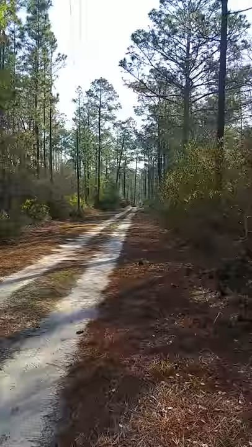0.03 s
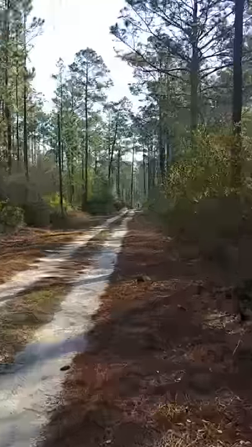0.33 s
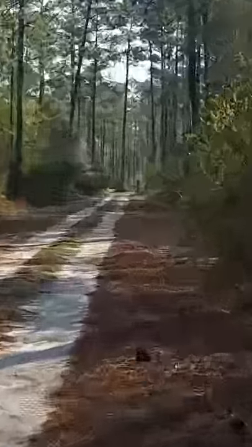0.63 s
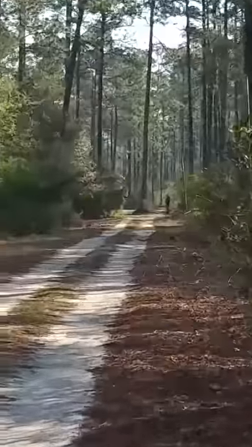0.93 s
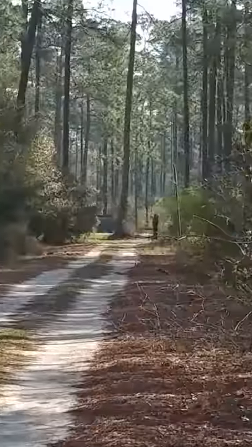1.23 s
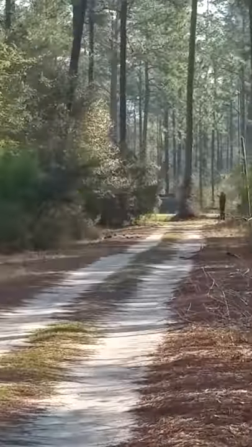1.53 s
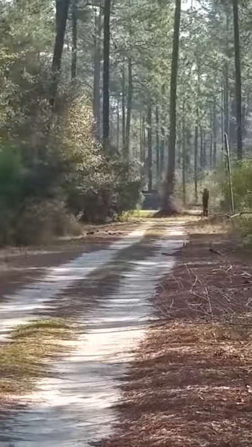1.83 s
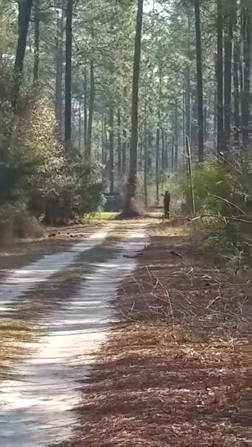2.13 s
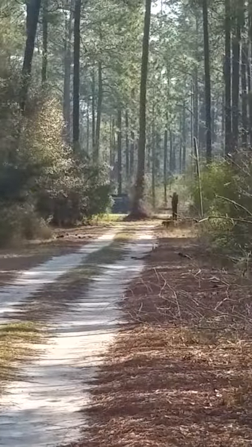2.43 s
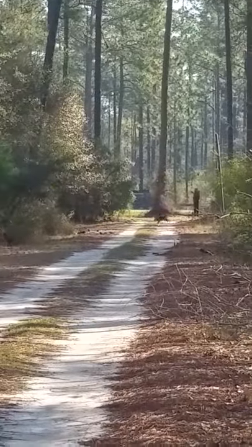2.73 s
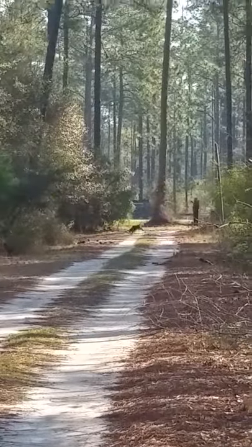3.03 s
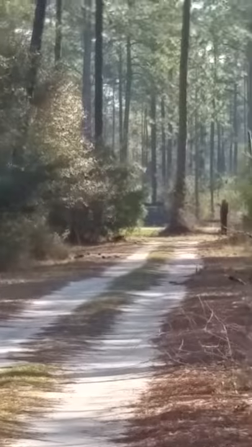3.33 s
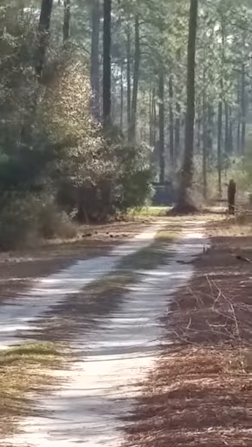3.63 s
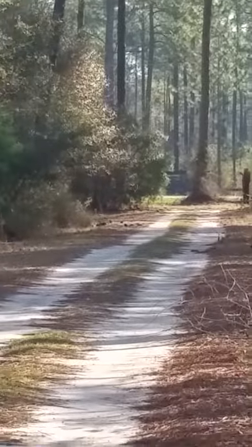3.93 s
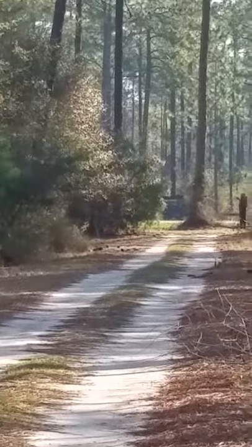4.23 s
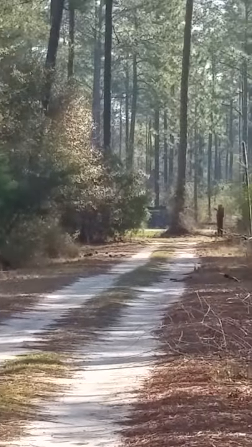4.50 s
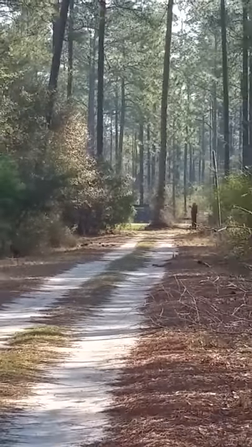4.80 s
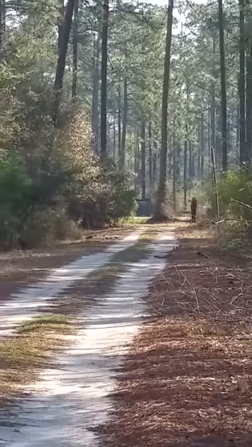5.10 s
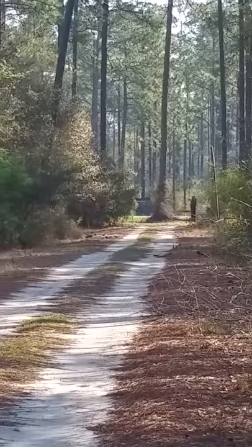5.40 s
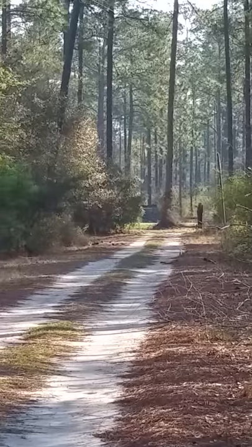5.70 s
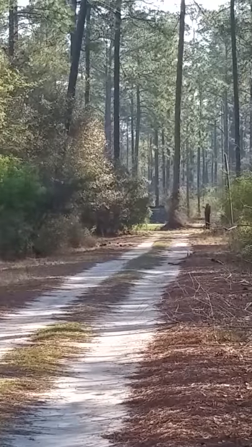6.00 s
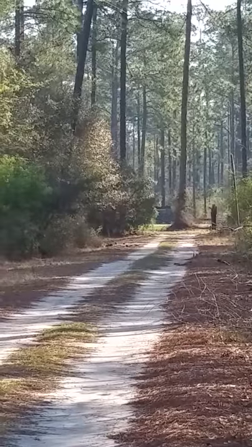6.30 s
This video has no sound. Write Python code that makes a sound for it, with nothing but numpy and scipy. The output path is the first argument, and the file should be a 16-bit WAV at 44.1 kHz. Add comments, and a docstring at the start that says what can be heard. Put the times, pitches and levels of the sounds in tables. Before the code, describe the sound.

Hounds bay and yelp in echoing woods, one deeper dog closer, with soft handling thuds on the microphone.

```python
"""Hounds baying along a trail in pine woods, heard from a hand-held camera's two microphones.
A deep-voiced dog passes closer for four loud calls, each a high yelp that breaks into a hoarse bay.
A shriller dog and the pack stay farther off, and the trunks scatter their cries into a long echo.
Close up, fingers bump and rub the camera and a few twigs tick, over a faint hush and microphone hiss."""
import sys
import numpy as np
from scipy import signal
from scipy.fft import rfft, irfft, next_fast_len
from scipy.io import wavfile
from scipy.ndimage import uniform_filter1d

SR = 44100
rng = np.random.default_rng(int(sys.argv[2]) if len(sys.argv) > 2 else 0)


def unload_wav(signal):
    """Save mono or channel-first audio to the path in sys.argv[1] as 16-bit WAV at rate SR, clipped to [-1, 1]."""
    wavfile.write(
        sys.argv[1],
        SR,
        np.round(np.clip(np.atleast_2d(signal).T, -1, 1) * 32767).astype(np.int16),
    )


N = 288855
TIME = np.arange(N) / SR

# voice of the shrill hound and the pack as it carries over the ground: f/Hz, level/dB
SHRILL_THROAT = [(150, -53), (440, -20.5), (590, 4.5), (740, -3.5), (900, 0.5), (1070, 0.5), (1350, -5.5),
                 (1800, -8), (2020, -15), (2230, -8), (2480, -16), (3150, -34), (9000, -72)]
# contour of a bark: crest/share of length, rise/octaves, fall/octaves, steepness of the fall,
# start level/dB, end level/dB, growth of roughness
BARK_ARCH = (0.39, 0.1, 0.26, 1.5, -4, -6, 0.07)


def deep_hound(yelp_s=0.0454, break_s=0.029, yelp_ratio=1.38, yelp_rough=0.14, echo_db=-10):
    """Nearest dog: a yelp cracks down into a bay; brush hides him except when he crosses the track."""
    # t/s, yelp level/dB, bay length/s, bay f/Hz, bay level/dB, direct gain/dB, tilt/(dB per octave)
    calls = [(2.208, -37, 0.16, 655.5, -32.5, -13, 9.5), (3.172, -31.5, .14, 658.6, -29.5, 0, 3),
             (3.503, -30, 0.12, 598.7, -34, 1.5, 0), (3.836, -32.5, 0.12, 599, -35.5, .5, -1.5),
             (4.174, -35, .125, 599, -37.5, -2, -0.5), (4.836, -53, .14, 595.4, -39.5, -6, 6),
             (5.202, -41.5, .13, 593, -38.5, -4.5, 3)]
    # the nearly pure yelp and the fuller bay as they carry over the ground: f/Hz, level/dB
    head_voice = [(200, -42), (800, 1.5), (1100, -4.5), (1650, -20), (2500, -30), (3400, -43), (9000, -100)]
    throat = [(150, -55), (330, -38), (440, -15), (540, -12), (630, 7), (800, -9.5), (1100, -3.5),
              (1280, -16), (1450, -21.5), (1760, -13.5), (2080, -29), (2330, -27), (2850, -26.5),
              (3300, -49), (9000, -100)]
    # contours of yelp and bay: columns as in BARK_ARCH
    yelp_arch = (0.72, 0.28, 0, 3.5, -19.5, -18, 0.7)
    bay_arch = (0.4359, 0.41, 0.55, 2.5, -12, -6, 1)
    direct, uttered = np.zeros((2, N))
    for k, (s, yelp_db, length, hz, bay_db, direct_db, tilt) in enumerate(calls):
        rough = 0.22 + 0.065 * k  # hoarser with every call
        yelp = voice(yelp_s, arch(*yelp_arch), yelp_ratio * hz, yelp_rough, head_voice)
        bay = voice(length, arch(*bay_arch), hz, rough, tilted(throat, hz, tilt))
        call = np.zeros(SR // 2)
        add(call, 0, gain_of(yelp_db) * yelp)
        add(call, break_s, gain_of(bay_db) * bay)
        add(uttered, s, call)
        add(direct, s, gain_of(direct_db) * call)
    return direct + gain_of(echo_db) * woods(uttered)


def shrill_hound(easy_hz=1057.2, bark_hz=587, direct_db=-3, echo_db=-1, bounce_s=0.065, bounce_db=-6):
    """Farther off: a thin yelp breaks into a rough bark about an octave lower, half lost in echo."""
    # t/s, yelp length/s, starting f/Hz, yelp level/dB, bark level/dB
    calls = [(0.476, 0.048, 1182, -46.5, -47.5), (0.821, 0.052, 1156, -45, -46.5),
             (1.197, 0.063, 1089, -46.5, -45), (1.566, 0.047, 1082, -46.5, -45),
             (1.922, 0.052, 1101, -46, -47.5), (2.238, 0.051, 1097, -45, -47.5),
             (2.643, 0.049, 1064, -44, -47.5), (3.004, .09, 1120, -45, -48),
             (3.677, .045, 1235, -40.5, -49), (4.043, .07, 1063, -46.5, -49), (4.399, .04, 908, -49, -45.5),
             (4.813, .04, 1139, -47.5, -44), (4.918, 0.058, 990, -45, -46.5), (5.246, .06, 1129, -46, -50),
             (5.47, .05, 1101, -60, -45.5), (5.811, .06, 1182, -55.5, -50.5)]
    dog, repeats = np.zeros((2, N))
    for s, length, yelp_hz, yelp_db, bark_db in calls:
        fall = 0.651 * np.log2(yelp_hz / easy_hz)  # slides part of the way to the dog's easy pitch
        slide = arch(crest=0.15, rise=0, fall=fall, steep=0.73, start_db=-7.5, end_db=-4, hoarser=0.9)
        bright_throat = tilted(SHRILL_THROAT, yelp_hz, db_per_octave=2)
        yelp = gain_of(yelp_db) * voice(length, slide, yelp_hz, rough=0.11, throat=bright_throat)
        bark = voice(0.085, arch(*BARK_ARCH), bark_hz, rough=0.83, throat=SHRILL_THROAT)
        add(dog, s, yelp)
        add(dog, s + 0.6 * length, gain_of(bark_db) * bark)
        # the yelp bounces between the walls of trees on both sides of the trail
        for bounce in range(1, 4):
            add(repeats, s + bounce * bounce_s, gain_of(bounce * bounce_db) * yelp)
    return gain_of(direct_db) * (dog + repeats) + gain_of(echo_db) * woods(dog)


def far_pack(count=48, bay_hz=590, yelp_hz=1130, spread=0.055, chorus_db=-56):
    """Deep in the woods: a passing chorus of yelps and bays, heard only as echo; two dogs howl."""
    # drawn-out cries: t/s, length/s, f/Hz, level/dB, roughness/0-1
    howl_calls = [(6.227, .24, 715, -48.5, 0.23), (6.247, .19, 1043, -48.5, 0.47)]
    # contour of a howl: columns as in BARK_ARCH
    howl_arch = (0.08, 0.1, 0.13, 1.5, -7, -6.5, 0.3)
    chorus, howls = np.zeros((2, N))
    for k, (delay, detune) in enumerate(rng.random((count, 2))):
        hz = (yelp_hz if k % 2 else bay_hz) * (1 + spread * (2 * detune - 1))
        cry = voice(0.11, arch(*BARK_ARCH), hz, rough=0.58, throat=SHRILL_THROAT)
        add(chorus, (k + delay) / count * N / SR, cry)
    for s, length, hz, db, rough in howl_calls:
        add(howls, s, gain_of(db) * voice(length, arch(*howl_arch), hz, rough, SHRILL_THROAT))
    passing_db = swell_db(crest_s=3.68, rise_s=0.46, fall_s=1, height_db=7.5)
    distant = gain_of(chorus_db + passing_db) * evened(woods(chorus))
    return distant + gain_of(-6) * howls + gain_of(-2) * woods(howls)


def voice(length, contour, hz, rough, throat):
    """Uneven vocal fold pulses and a puff of air in each cycle, both passing the throat."""
    size = int(length * SR)
    wobble, hiss, *flutter = rng.standard_normal((8, SR // 2))[:, :size]
    bend, level_db, strain = course(contour, np.linspace(0, 1, size))
    rough = np.clip(rough * strain, 0, 1)
    jitter = (0.0057 + 0.037 * rough) * evened(uniform_filter1d(wobble, size=70))
    cycles = np.cumsum(hz * bend * (1 + jitter)) / SR
    # no two cycles close alike, which blurs the overtones and spares the fundamental
    blur = 0.97 * rough * evened(uniform_filter1d(np.array(flutter), size=130))
    folds = sum(np.cos(2 * np.pi * (k + 1) * cycles + k * wander) for k, wander in enumerate(blur))
    folds *= 1 + 0.93 * rough * np.cos(2 * np.pi * cycles / 3)  # strain favours every third cycle
    puffs = hiss * (0.4 + np.exp(-(cycles % 1) / 0.23))
    tone = np.sqrt(1 - rough ** 2) * coloured(folds, throat)
    breath = 0.95 * rough ** 2 * coloured(puffs, throat)
    return (tone + breath) * gain_of(level_db) * signal.windows.tukey(size, 0.12)


def arch(crest, rise, fall, steep, start_db, end_db, hoarser):
    """The contour of a cry: pitch and level climb to a crest and sink as the voice frays."""
    progress = np.linspace(0, 1, 65)
    before = np.clip(1 - progress / crest, 0, 1)
    after = np.clip((progress - crest) / (1 - crest), 0, 1)
    bend = 2 ** (-rise * before ** 1.408 - fall * after ** steep)
    level_db = start_db * before ** 2 + end_db * after ** 1.2
    strain = 1 + hoarser * (after / 2 - before)
    return np.transpose([progress, bend, level_db, strain])


def woods(x, build_s=0.014, echoes_per_s=1500):
    """Trunks scatter a call into countless small echoes that build, then die away."""
    # echo among the trunks: f/Hz, time to fall 60 dB/s
    decay_times = [(300, 0.83), (600, 1.44), (1100, 1.59), (2200, 1.56), (3500, 1.38)]
    # its stereo image: f/Hz, left-right likeness/0-1
    likeness = [(300, 0.9), (600, 0.99), (1100, 0.77), (2200, 0.6), (4000, .3)]
    size = 3 * SR // 2
    echoes = rng.standard_normal((2, size)) * (rng.random(size) < echoes_per_s / SR)
    hz, t, bands = signal.stft(alike(echoes, likeness), SR, nperseg=256)
    envelope = gain_of(-60 * t / read(decay_times, hz)[:, None]) * (1 - np.exp(-t / build_s))
    tail = signal.istft(bands * envelope, SR, nperseg=256)[1]
    return signal.fftconvolve(x[None], tail / np.linalg.norm(tail[0]), axes=1)[:, :N]


def microphone_ports(pair):
    """Sound from down the trail reaches the two microphones with different phase and level."""
    # phase between the ports: f/Hz, lead of the left/rad
    phase = [(300, 2), (540, -1.26), (680, 0.5), (1030, 0.48), (1380, 1.05), (1700, 0.89), (2300, 0.92),
             (3000, 1.5)]
    # balance between the ports: f/Hz, left over right/dB
    balance = [(300, 0), (620, -1.2), (1100, 0.34), (2200, 0.05)]
    size = next_fast_len(N)
    hz = np.fft.rfftfreq(size, 1 / SR)
    left = gain_of(read(balance, hz) / 2) * np.exp(1j * read(phase, hz) / 2)
    return irfft(rfft(pair, size) * np.array([left, 1 / left]), size)[:, :N]


def handling(grip_db=-63, fidget_db=3, thud_cycles=0.45):
    """At the microphones: the camera rumbles in a fidgeting hand and rocks once at each bump."""
    # rumble of the camera body: f/Hz, level/dB
    rumble = [(15, -24), (30, -1.5), (60, 1), (115, -5.5), (170, -19), (260, -24.5), (600, -65),
              (2000, -87)]
    # the firmest shifts of grip: t/s, length/s, level/dB, left over right/dB
    rubs = [(1.206, 0.16, -52.5, 22), (2.425, .11, -45, -12), (3.081, 0.093, -51.5, -20),
            (4.512, 0.056, -45.5, 12), (5.726, 0.167, -41.5, -13), (5.93, 0.12, -48, -10),
            (6.239, 0.29, -43.5, 5.5)]
    # finger bumps: t/s, level/dB, f/Hz, left over right/dB
    thuds = [(2.304, -39, 73.4, 18), (3.166, -41, 66, 19), (3.356, -39, 64, 29), (3.548, -36.5, 84.4, 22),
             (4.459, -38.5, 66, 24), (4.653, -40, 68, -18), (4.857, -29.5, 86, -31)]
    fidget = coloured(rng.standard_normal((2, N)), [(0, 0), (9, 0), (18, -40), (90, -100)])
    restless_db = swell_db(crest_s=5.3, rise_s=2.4, fall_s=1, height_db=8)
    grip = gain_of(grip_db + restless_db + fidget_db * fidget)
    out = grip * coloured(rng.standard_normal((2, N)), rumble)
    for s, length, db, side_db in rubs:
        size = int(length * SR)
        rub = evened(coloured(rng.standard_normal((2, SR // 2)), rumble)[:, :size])
        add(out, s, gain_of(db) * panned(rub * signal.windows.tukey(size, 0.5), side_db))
    t = np.arange(-SR // 20, SR // 20) / SR
    for s, db, hz, side_db in thuds:
        rock = -np.sin(2 * np.pi * hz * t) * np.exp(-(hz * t / thud_cycles) ** 2)
        add(out, s + t[0], gain_of(db) * panned(rock, side_db))
    return out


def twigs(decay_s=0.0014, edge_ratio=0.37):
    """Close by: dry twigs snap, each a tiny burst of noise around one pitch."""
    # snaps: t/s, level/dB, f/Hz
    ticks = [(4.918, -69, 9900), (5.476, -58, 4300), (5.539, -66, 7700)]
    out = np.zeros((2, N))
    t = np.arange(SR // 50) / SR
    envelope = np.e * t / decay_s * np.exp(-t / decay_s)
    for s, db, hz in ticks:
        band = [(hz * edge_ratio, -30), (hz, 0), (hz / edge_ratio, -40)]
        burst = coloured(rng.standard_normal((2, len(t))), band)
        add(out, s, gain_of(db) * burst * envelope)
    return out


def air(db=-61):
    """All around: a soft hush in the pines over the hiss of the microphones."""
    # forest air and hiss: f/Hz, level/dB
    spectrum = [(30, -4), (180, -3), (290, 1.5), (430, -5.5), (1200, -11), (2500, -20.5), (3400, -22),
                (4900, -25.5), (5850, -20.5), (6500, -27.5), (8500, -30), (12500, -27), (16000, -28)]
    # their stereo image: f/Hz, left-right likeness/0-1
    likeness = [(60, 1), (280, 0.9), (1000, 0.64), (3500, 0), (12000, 0)]
    noise = alike(rng.standard_normal((2, N)), likeness)
    return gain_of(db) * panned(coloured(noise, spectrum), side_db=1)


def gain_of(db):
    """Decibels to a factor."""
    return 10 ** (np.asarray(db) / 20)


def evened(x):
    """Scales to rms 1."""
    return x / np.sqrt(np.mean(x ** 2) + 1e-20)


def course(rows, at):
    """Every column of a curve, read at the given places."""
    knots, *columns = np.transpose(rows)
    return [np.interp(at, knots, column) for column in columns]


def read(points, hz):
    """A spectrum, read on a log-frequency axis."""
    f, value = np.transpose(points)
    return np.interp(np.log(hz + 1), np.log(f + 1), value)


def add(mix, s, sound):
    """Mixes a sound in at time s."""
    part = mix[..., max(round(s * SR), 0):][..., :sound.shape[-1]]
    part += sound[..., :part.shape[-1]]


def coloured(x, spectrum):
    """Filters x by a spectrum, to rms 1."""
    size = next_fast_len(x.shape[-1])
    shaped = rfft(x, size) * gain_of(read(spectrum, np.fft.rfftfreq(size, 1 / SR)))
    return evened(irfft(shaped, size)[..., :x.shape[-1]])


def tilted(spectrum, pivot_hz, db_per_octave):
    """Brightens or dulls a spectrum about a pivot."""
    return [(f, level + db_per_octave * np.log2(f / pivot_hz)) for f, level in spectrum]


def alike(pair, likeness):
    """Makes two unrelated channels share part of their sound, band by band."""
    size = pair.shape[-1]
    left, right = rfft(pair)
    same = np.clip(read(likeness, np.fft.rfftfreq(size, 1 / SR)), -1, 1)
    return irfft(np.array([left, same * left + np.sqrt(1 - same ** 2) * right]), size)


def panned(x, side_db):
    """Places a sound left or right at constant power."""
    return evened(gain_of([[side_db / 2], [-side_db / 2]])) * x


def swell_db(crest_s, rise_s, fall_s, height_db):
    """A level that grows to one crest and ebbs again."""
    width_s = np.where(TIME < crest_s, rise_s, fall_s)
    return height_db * np.exp(-((TIME - crest_s) / width_s) ** 2)


def scene():
    """The hounds down the trail, the small sounds at the camera and the forest air."""
    hounds = deep_hound() + shrill_hound() + far_pack()
    return microphone_ports(hounds) + handling() + twigs() + air()


def record(dry):
    """The recorder fades in after a moment of silence and cuts the highest treble."""
    open_s, fade_s, gain_db, cutoff_hz = 0.41, 0.3, 1, 15720
    faded = dry * gain_of(gain_db) * np.clip((TIME - open_s) / fade_s, 0, 1)
    lowpass = signal.firwin(511, cutoff_hz, window=("kaiser", 9), fs=SR)
    return signal.oaconvolve(faded, lowpass[None], "same")


dry = scene()
out = record(dry)
unload_wav(out)
```